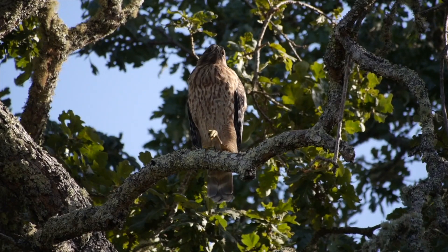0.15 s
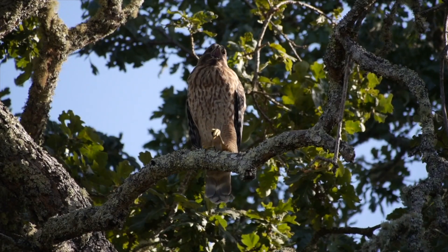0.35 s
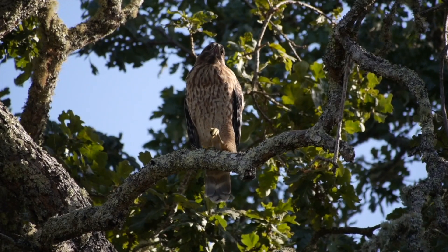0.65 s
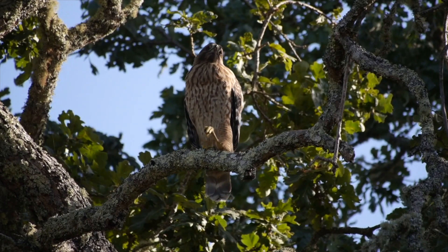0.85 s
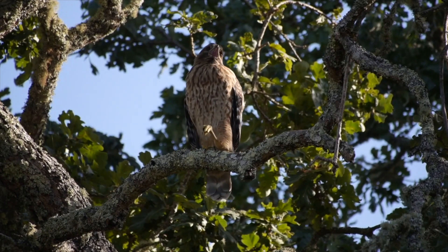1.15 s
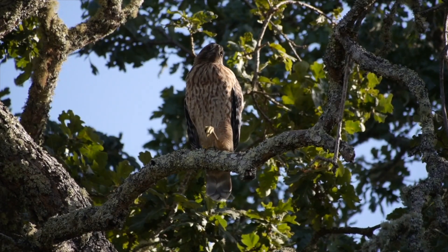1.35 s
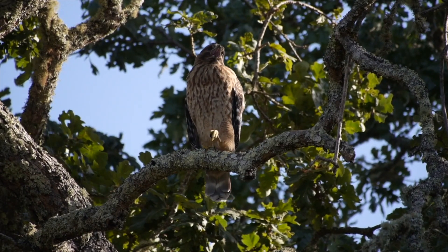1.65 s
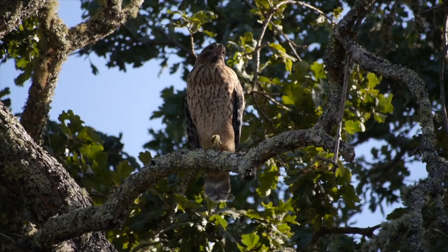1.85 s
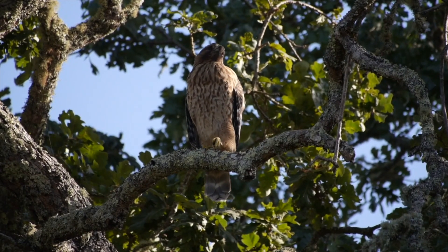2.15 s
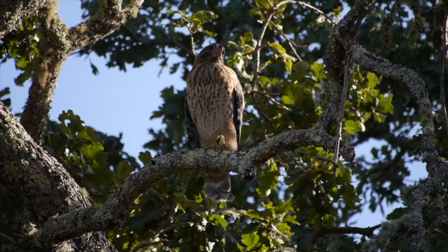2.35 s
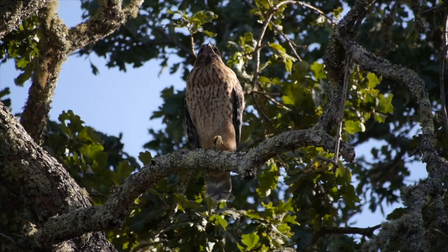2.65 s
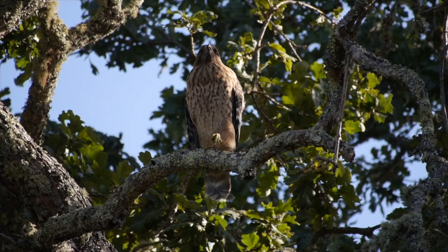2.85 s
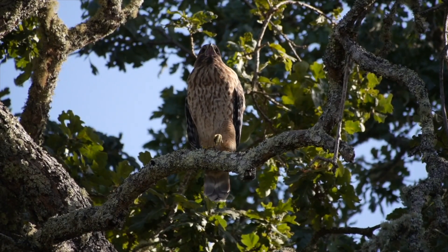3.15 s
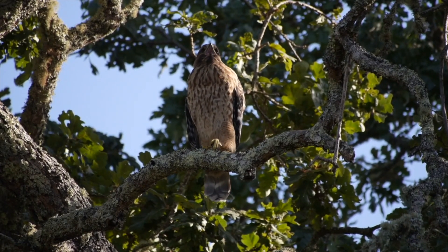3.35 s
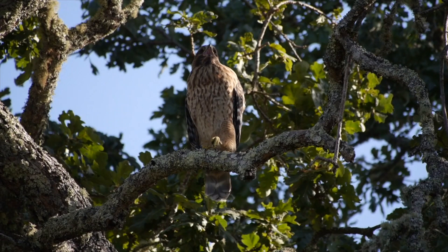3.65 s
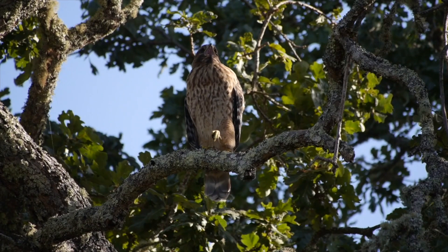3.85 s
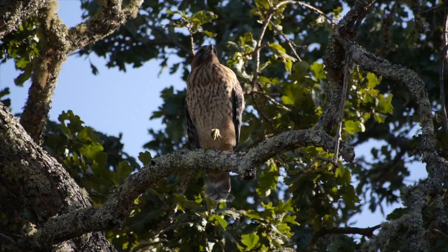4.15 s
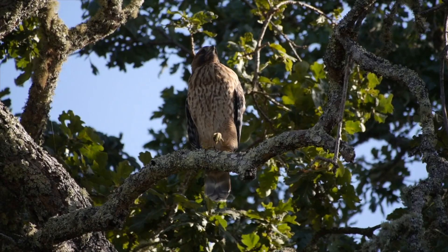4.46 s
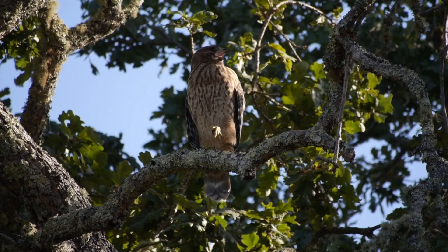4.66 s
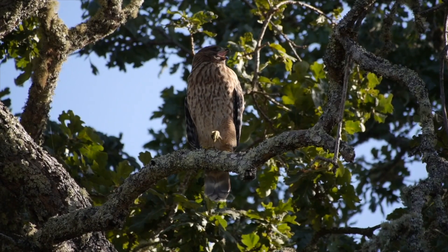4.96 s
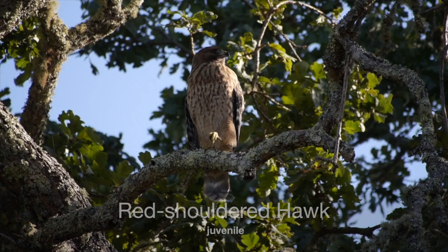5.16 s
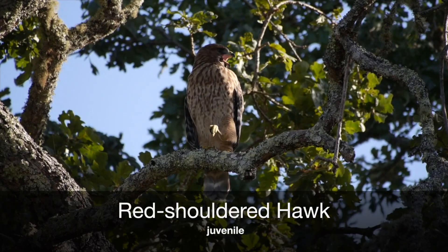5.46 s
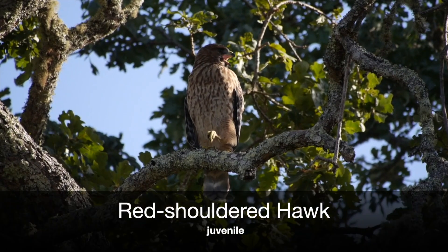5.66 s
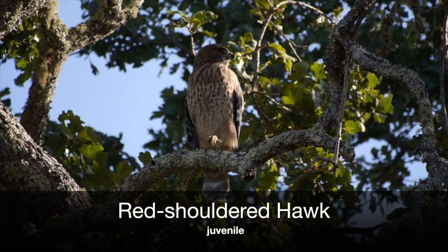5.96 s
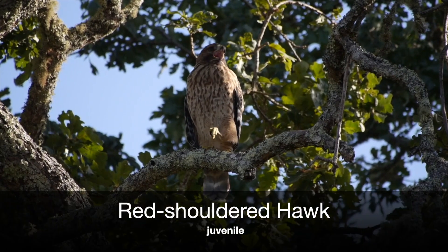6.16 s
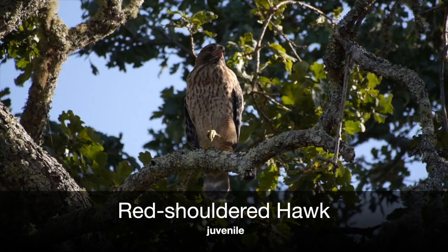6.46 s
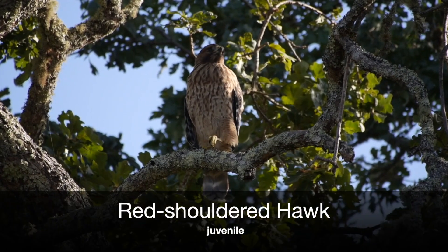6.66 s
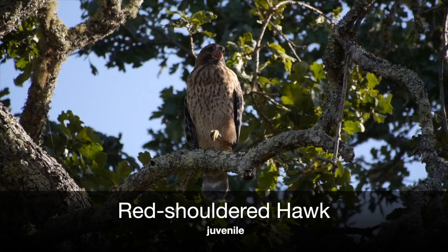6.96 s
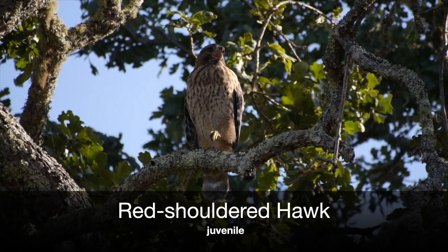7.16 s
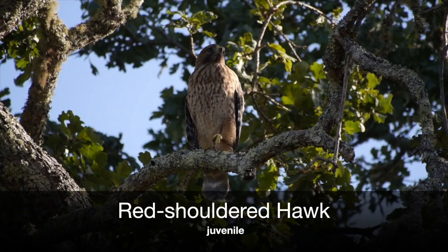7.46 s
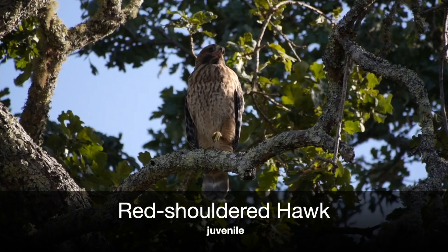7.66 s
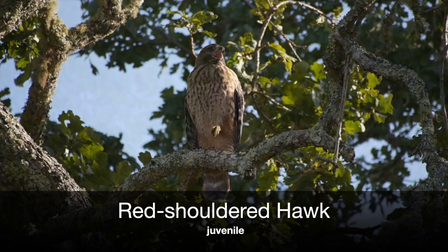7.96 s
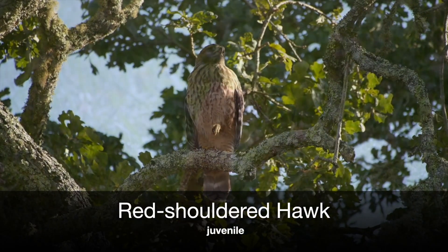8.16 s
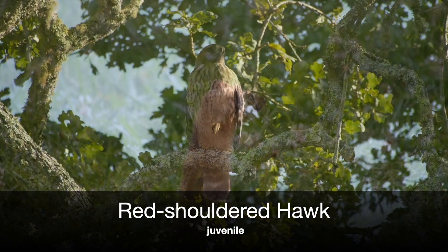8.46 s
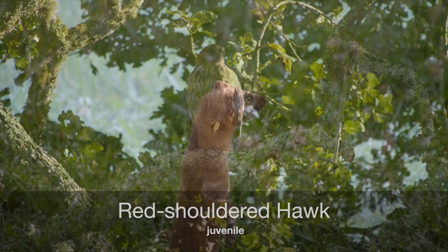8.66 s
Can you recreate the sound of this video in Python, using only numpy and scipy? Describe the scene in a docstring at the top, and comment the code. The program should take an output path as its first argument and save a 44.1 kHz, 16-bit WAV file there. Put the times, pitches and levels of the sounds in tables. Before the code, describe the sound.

A young hawk screams from a tree, twelve calls in an even series, a little more than one a second. Each cracks up to a high note, slides down and breaks off hoarsely, with a short woodland echo. The bird stands out clearly over quiet outdoor air, faint twig ticks, rustling leaves and two tiny chirps from a distant songbird. After the last call, a low, distant engine drone swells.

```python
"""A young hawk is already screaming in an oak, over quiet air and a far hum. It calls twelve times:
its voice box (the syrinx) cracks up to a high note, slides down and breaks off hoarsely. A strong
reflection beats against each gliding call, and the wood echoes it. Along the way twigs tick, leaves
rustle and a small bird chirps twice. At the end a low engine drone swells."""
import sys
import numpy as np
from scipy import signal
from scipy.fft import rfft, irfft, next_fast_len
from scipy.io import wavfile
from scipy.ndimage import uniform_filter1d

SR = 44100
rng = np.random.default_rng(int(sys.argv[2]) if len(sys.argv) > 2 else 0)


def inscribe(sig):
    """Save sig as 16-bit PCM at rate SR to the path in sys.argv[1].

    A 1-D sig is mono; a 2-D sig holds one channel per row.
    Samples are clipped to [-1, 1] before scaling.
    """
    pcm = np.round(np.clip(np.atleast_2d(sig).T, -1, 1) * 32767)
    wavfile.write(sys.argv[1], SR, pcm.astype(np.int16))


N = 388962
T = np.arange(N) / SR
TOP_HZ = 15600  # sound above this is cut

# how the throat and open beak favour some frequencies: f/Hz, level/dB
THROAT = [(750, -20), (1200, -23), (1700, -9), (2100, -4.5), (2550, -0.5), (3000, -5), (3500, -15),
          (4300, -22.5), (5100, -20), (6100, -26), (8200, -29.5), (9400, -41), (11500, -37.5), (15000, -53)]


def hawk():
    """All the screams; reflections weaken and strengthen each harmonic in turn as it slides."""
    # one call a row: start/s, time to the break/s, rise/s, peak held until/s, drop/s, collapse/s,
    # peak f/Hz, f the drop heads for/Hz, f the slide heads for/Hz, level/dB, brightness/dB
    screams = [(-0.22, 0.37, 0.027, 0.11, 0.064, 0.032, 1738, 1456, 1163, -31, -1.5),
               (0.424, 0.37, 0.019, 0.094, 0.065, 0.03, 1744, 1425, 1173, -31.5, 0.5),
               (1.066, 0.371, 0.019, 0.1, 0.031, 0.041, 1742.0, 1559, 1191, -30.5, 0.5),
               (1.71, 0.36, 0.021, 0.11, 0.036, 0.031, 1740, 1557, 1172, -30.5, 1.0),
               (2.364, 0.47, 0.028, 0.1, 0.15, 0.045, 1741.0, 874.0, 1231, -31, 0.0),
               (3.1, 0.4, 0.023, 0.11, 0.041, 0.041, 1735, 1471, 1198, -30, -0.5),
               (3.799, 0.42, 0.029, 0.1, 0.084, 0.041, 1751, 1445, 1188, -30.5, 0.5),
               (4.643, 0.48, 0.023, 0.14, 0.034, 0.052, 1690, 1527, 1182, -31, -6.5),
               (5.406, 0.406, 0.029, 0.091, 0.09, 0.07, 1673, 1304, 1282, -30.5, -11.5),
               (6.187, 0.42, 0.03, 0.11, 0.06, 0.057, 1729, 1458.0, 1216, -30.5, -3.5),
               (6.944, 0.43, 0.036, 0.093, 0.085, 0.056, 1751, 1407.0, 1233, -30.5, -3.5),
               (7.812, 0.41, 0.041, 0.1, 0.11, 0.075, 1755, 1201.0, 1313, -31, -4.0)]
    # bounces off nearby surfaces: delay/ms, gain
    reflections = [(5.79, 0.8), (5.148, -0.19), (4.571, -0.21), (3.987, -0.13)]
    voice = sum(scream(call) for call in screams)
    return voice + sum(gain * delay(voice, ms) for ms, gain in reflections)


def scream(call, hoarse_hz=1130, strain_s=.13, tremble_db=.73, rattle_db=2.3):
    """One call: air shakes the membranes of the syrinx, strained at first and slack at the end."""
    start, length, _, _, _, collapse_s, *_, call_bright_db = call
    size = int((length + collapse_s) * SR)
    t = T[:size]
    hz = pitch_glide(t, call)
    level_db, bright_db = effort(t, hz, call)
    hz = hz * (1 + .0038 * wander(size, 40))  # a slight waver
    hz = uniform_filter1d(hz, size=130, mode="nearest")  # round off the corners
    slack = 1 / (1 + np.exp(np.clip((hz - hoarse_hz) / 35, -30, 30)))  # near 1 at low pitch
    strain = np.exp(-(t / strain_s) ** 4)  # near 1 on the opening note
    # the membranes rattle when slack and shake a little under strain
    rough = slack * (.023 * (1 - strain) + .017 * strain) + .0025 * strain
    flutter = (.0015 + .003 * np.clip(bright_db / 10, 0, 1)) * wander(size, 160)
    hz = hz * (1 + rough * wander(size, 500) + flutter)
    phase = 2 * np.pi * np.cumsum(hz) / SR
    voice = syrinx(hz, phase, slack, strain, bright_db, call_bright_db)
    voice += torn_air(phase, slack, strain, bright_db)
    # the voice trembles slightly, and sputters as it collapses
    level_db += tremble_db * wander(size, 86)
    level_db += rattle_db * slack * (1 - strain) * wander(size, 280)
    fades = np.clip(t / .005, 0, 1) * np.clip((t[-1] - t) / .012, 0, 1)
    out = np.zeros(N)
    at = int(start * SR) + np.arange(size)
    heard = (at >= 0) & (at < N)
    out[at[heard]] = (voice * undb(level_db) * fades)[heard]
    return out


def pitch_glide(t, call, slack_hz=700, clear_hz=1420, break_hz=1147, crack_s=.022,
                favourite_hz=1281.4, step_hz=85.9, linger=.2):
    """Slack membranes crack up to a clear note; it rises, holds, drops, slides and collapses."""
    # the voice catches and lifts for a moment: t/s, length/s, lift/Hz
    catches = [(0.581, 0.059, 46), (2.696, 0.12, 32.1), (6.384, .06, 51)]
    start, length, rise_s, hold_s, drop_s, collapse_s, peak_hz, drop_hz, end_hz, _, _ = call

    def ease(begin_s, span_s):
        """Stay at 1 until begin_s, then sink smoothly towards 0."""
        return np.exp(-(np.maximum(t - begin_s, 0) / span_s) ** 1.3)

    hz = drop_hz + (peak_hz - drop_hz) * ease(hold_s, drop_s)  # peak and quick drop
    hz -= (peak_hz - clear_hz) * ease(crack_s, rise_s)  # rise to the peak
    hz += (end_hz - drop_hz) * np.maximum(t - hold_s, 0) / (length - hold_s)  # slow slide
    hz -= (end_hz - break_hz) * np.exp(np.minimum(t - length, 0) / (.4 * collapse_s))  # last sag
    for s, catch_s, lift_hz in catches:
        hz += lift_hz * np.sin(np.pi * np.clip((start + t - s) / catch_s, 0, 1)) ** 2
    # the slide lingers on notes step_hz apart
    hz -= linger * step_hz / (2 * np.pi) * np.sin(2 * np.pi * (hz - favourite_hz) / step_hz)
    hz = np.where(t < crack_s, slack_hz + (clear_hz - slack_hz) * (t / crack_s) ** 1.4, hz)
    collapse = np.exp(-np.maximum(t - length, 0) / (.55 * collapse_s))
    return np.where(t > length, slack_hz + (break_hz - slack_hz) * collapse, hz)


def effort(t, hz, call, attack_s=.027, push_s=.078, crack_s=.022):
    """Level and brightness in dB: both follow the pitch and are lifted by the first push of air."""
    # how loud and shrill the syrinx is at each pitch: f/Hz, level/dB, brightness/dB
    register = [(700, -12, -7.5), (900, -10.5, -2.5), (1188, -1.5, -0.5), (1233, 0.5, 0), (1293, 2, -5),
                (1390, -1.5, -2.5), (1458, -1.5, 9.5), (1525, -0.5, 13.5), (1677, 0.8, 6.5), (1730, 1, 0)]
    note_hz, note_db, note_bright_db = np.transpose(register)
    _, _, _, hold_s, *_, call_db, call_bright_db = call
    push = np.exp(-(t / push_s) ** 2)
    attack_db = -16.5 * np.maximum(1 - t / attack_s, 0)
    level_db = call_db + attack_db + 3 * push + np.interp(hz, note_hz, note_db) * (t > crack_s)
    # a weak scream gets duller still on the way down
    bright_db = call_bright_db * np.interp(t, [hold_s, 2 * hold_s], [.77, 1])
    return level_db, bright_db + 5 * push + np.interp(hz, note_hz, note_bright_db)


def syrinx(hz, phase, slack, strain, bright_db, call_bright_db):
    """Vibrating membranes make harmonics (multiples of the pitch) that ring in the throat."""
    # strength of the first harmonics, the last also for all above: level/dB
    harmonics_db = [3, 0.5, -5.5, -5.5, -6, -6.5]
    # tones between the harmonics: multiple of the pitch, level/dB
    growl = [(1.5, -29.5), (1.75, -18.5)]
    # how much of the brightness each part of the treble takes: f/Hz, share
    shrill = [(3000, 0.058), (5000, 0.47), (6300, 1), (8000, 0.66), (12000, 0.28)]
    throat_hz, throat_db = np.transpose(THROAT)
    size = len(hz)

    def tone(k, db):
        """A sine at k times the pitch, shaped by the throat and brightened by effort."""
        tone_hz = k * hz
        db = db + np.interp(np.log(tone_hz), np.log(throat_hz), throat_db)
        db += bright_db * np.interp(tone_hz, *np.transpose(shrill))
        # weak screams lose extra treble at the very top
        db += .52 * call_bright_db * np.interp(tone_hz, (9000, 12100), [0, 1])
        return np.sqrt(2) * undb(db) * np.sin(k * phase) * (tone_hz < TOP_HZ)

    # the lowest tone takes a moment to build, and fades when the membranes go slack
    build_db = -8 * np.exp(-(T[:size] / .027) ** 2)
    voice = tone(1, harmonics_db[0] + build_db - 4 * slack * (1 - strain))
    for k in range(2, 15):
        base_db = harmonics_db[min(k, len(harmonics_db)) - 1]
        flicker_db = min(2.3 * max(k - 2, .3), 2.6) * wander(size, 30)  # upper ones flicker most
        slack_db = 3 * slack * (k == 3)  # slack membranes favour the third harmonic
        voice += tone(k, base_db + flicker_db + slack_db)
    # unequal cycles growl between the harmonics, under strain and where the voice breaks
    for k, growl_db in growl:
        voice += strain * tone(k, growl_db + 4 * wander(size, 60))
    return voice + slack * tone(2.5, -8 + 4 * wander(size, 200))


def torn_air(phase, slack, strain, bright_db):
    """Air torn once a cycle: a rasp that grows with effort, and a dull croak when slack."""
    # the rasp as it leaves the beak: f/Hz, level/dB
    rasp_colour = [(700, -19), (1500, -17), (2200, -4.5), (2900, 2), (3500, -18.5), (4200, -25.5),
                   (5200, -13), (6200, -10.5), (8200, -13.5), (9500, -20.5), (12000, -22), (15000, -41.5)]
    torn = rng.standard_normal(len(phase)) * (1 + np.cos(phase))
    rasp_db = -37 + .46 * bright_db + 6 * strain + 2 * wander(len(phase), 40)
    rasp = unit(colour(torn, rasp_colour)) * undb(rasp_db)
    croak = unit(colour(torn, THROAT)) * undb(-15) * slack
    return rasp + croak


def oak_wood(voice):
    """The direct sound, quick echoes in the oak's crown, and the long answer of the trees around."""
    # where the hawk sits: f/Hz, left minus right level/dB
    hawk_pan = [(700, 2.5), (1290, -1), (2380, -1.94), (4400, -2), (8120, 2.5), (15000, 1)]
    # tone of the wood's long echo: f/Hz, level/dB
    wood = [(700, -1.5), (1500, 2), (2500, -0.5), (3100, 2), (3800, 5.5), (5000, 9.5), (6000, 8.5),
            (10000, -15), (15000, -25)]
    direct = np.array([colour(voice, [(hz, side * db / 2) for hz, db in hawk_pan]) for side in (1, -1)])
    off_leaves = colour(voice, [(1500, -3), (2700, -1), (4000, 2), (5500, 7), (10000, 8)])
    crown = scatter(off_leaves, decay_s=.19, db=-14.5, onset_s=.002)
    trees = scatter(colour(voice, wood), decay_s=.68, db=-20, onset_s=.0069)
    return direct + crown + trees


def scatter(x, decay_s, db, onset_s):
    """Echoes from countless leaves and limbs, dying away by 60 dB in decay_s."""
    t = T[:2 * SR]
    tail = diffuse()[:, :len(t)] * np.exp(-np.log(1000) * t / decay_s) * (1 - np.exp(-t / onset_s))
    tail *= undb(db) / np.sqrt(np.sum(tail ** 2) / 2)
    return signal.fftconvolve(x[None], tail, axes=1)[:, :N]


def foliage(ring_s=.017, ring_width_hz=2200):
    """Twigs snap and ring briefly; leaves rustle."""
    # twigs: t/s, level/dB, centre f/Hz
    ticks = [(.92, -58, 4000), (1.667, -57, 5000), (2.146, -53, 5500), (3.076, -58, 5000),
             (8.052, -42.5, 5000), (8.556, -43.5, 2850), (8.659, -48.5, 2810), (8.741, -56, 4800)]
    # leaves: t/s, length/s, centre f/Hz, width/Hz, level/dB
    rustles = [(0.853, 0.56, 835, 900, -57.5), (1.526, 0.24, 1100, 900, -62),
               (7.368, 0.38, 5730, 1500, -71), (8.509, 0.04, 3680, 2480, -59.5)]
    noise, out = diffuse(), np.zeros((2, N))
    snap = unit(colour(noise, [(1000, -20), (3500, -3), (8000, -11), (15000, -28)])) * undb(-20)
    for s, db, hz in ticks:
        fade = np.exp(-np.log(1000) * np.abs(T - s) / ring_s) * (T >= s)
        ring = unit(resonate(resonate(noise, hz, ring_width_hz), hz, 2 * hz))
        out += (ring * fade + snap * fade ** 2) * undb(db - 3)
    for s, length, hz, width_hz, db in rustles:
        rustle = unit(resonate(resonate(noise, hz, width_hz), hz, width_hz))
        out += rustle * swell(s, length) * undb(db)
    return out


def songbird():
    """A small far bird gives thin, gliding whistles."""
    # whistles: t/s, length/s, start f/Hz, end f/Hz, level/dB
    chirps = [(1.622, 0.053, 3880, 4250, -63), (6.01, 0.087, 6750, 5950, -70)]
    out = np.zeros(N)
    for s, length, start_hz, end_hz, db in chirps:
        hz = np.interp(T, [s, s + length], [start_hz, end_hz]) * (1 + .008 * wander(N, 200))
        out += undb(db) * swell(s, length) * np.sin(2 * np.pi * np.cumsum(hz) / SR)
    return out


def engine(waver=.0033):
    """A distant motor: tones that follow one slightly unsteady shaft, over a rumble."""
    # the shaft's tones, before the swell: f/Hz, level/dB
    tones = [(80.7, -67), (161.4, -60.5), (242.1, -69.5), (322.8, -71), (403.6, -64), (942, -74),
             (1120, -83.5)]
    # shape of the rumble: f/Hz, level/dB
    rumble = [(25, -37), (50, -18.5), (85, -3.5), (170, -2), (260, -9.5), (550, -27), (1000, -14.5),
              (2100, -19.5), (4000, -29.5), (8000, -50), (15000, -62)]
    # how the whole drone swells: t/s, level/dB
    growth = [(7.9, -46), (8.15, -13.5), (8.4, -7), (8.65, -0.5), (8.82, 3)]
    drone = unit(colour(diffuse(), rumble)) * undb(-59)
    shaft_time = np.cumsum(1 + waver * wander(N, 8.2)) / SR
    for hz, db in tones:
        drone += np.sqrt(2) * undb(db + 1.5 * wander(N, 10)) * np.cos(2 * np.pi * hz * shaft_time)
    return pan(drone * undb(np.interp(T, *np.transpose(growth))), .5)


def air(hum_hz=780, hum_width_hz=7):
    """Quiet outdoor air with a thin, wavering hum far away."""
    # shape of the still air's hush: f/Hz, level/dB
    air_colour = [(25, -20), (45, -13.5), (100, -1.5), (160, -5), (280, -6.5), (500, -11.5), (800, -11),
                  (1300, -13), (2050, -21.5), (2500, -13.5), (3200, -25), (5000, -31), (9000, -40.5),
                  (15000, -49)]
    hush = unit(colour(diffuse(), air_colour)) * undb(-60.5 + .53 * wander(N, 1.5))
    hum = unit(resonate(resonate(diffuse(), hum_hz, hum_width_hz), hum_hz, 60)) * undb(-70)
    return pan(hush + hum, 1.5)


def diffuse():
    """Noise from all round: left and right share the bass and less of the treble."""
    mid, side = rng.standard_normal((2, N))
    side = colour(side, [(50, -29.5), (125, -27.5), (250, -12), (600, -6.0), (4000, -6.5)])
    return mid + np.array([side, -side])


def undb(db):
    """Turn decibels into a gain."""
    return np.exp(np.asarray(db) * np.log(10) / 20)


def unit(x):
    """Scale to an average size (rms) of 1."""
    return x / np.sqrt(np.mean(x ** 2))


def colour(x, points):
    """Turn frequencies up or down along a curve of (f/Hz, level/dB) points."""
    hz, db = np.transpose(points)
    size = next_fast_len(x.shape[-1], real=True)
    bins = np.maximum(np.fft.rfftfreq(size, 1 / SR), 1)
    gain = undb(np.interp(np.log(bins), np.log(hz), db))
    return irfft(rfft(x, size) * gain, size)[..., :x.shape[-1]]


def resonate(x, hz, width_hz):
    """Let through a band around hz, with gain 1 at its centre."""
    hz = min(hz, .45 * SR)
    return signal.lfilter(*signal.iirpeak(hz, hz / width_hz, fs=SR), x)


def wander(size, rate):
    """A smooth random curve of rms 1 that changes about rate times a second."""
    coarse = max(size // 8, 2)
    padded = next_fast_len(coarse)
    bins = np.fft.rfftfreq(padded, size / coarse / SR)
    slow = irfft(rfft(rng.standard_normal(padded)) / (1 + (bins / rate) ** 2), padded)[:coarse]
    return np.interp(np.linspace(0, coarse - 1, size), np.arange(coarse), unit(slow))


def delay(x, ms):
    """Delay by ms milliseconds, even between samples."""
    size = next_fast_len(len(x) + SR)
    turns = np.fft.rfftfreq(size, 1 / SR) * ms / 1000
    return irfft(rfft(x, size) * np.exp(-2j * np.pi * turns), size)[:len(x)]


def swell(start, length):
    """A smooth rise and fall."""
    return np.sin(np.pi * np.clip((T - start) / length, 0, 1))


def pan(x, db):
    """Make the left channel db louder than the right."""
    return x * undb(np.array([[db], [-db]]) / 2)


def scene():
    """The hawk in its wood, over the background."""
    return oak_wood(hawk()) + air() + engine() + foliage() + songbird()


def record(dry, ceiling_db=-21.8, react_s=.003):
    """A limiter holds the loudest swells down, and a filter cuts the highest treble."""
    keep = np.exp(-1 / (react_s * SR))
    power = signal.lfilter([1 - keep], [1, -keep], np.mean(dry ** 2, axis=0))
    gain = (1 + (power / undb(ceiling_db) ** 2) ** 4) ** (-1 / 8)
    return signal.sosfilt(signal.ellip(8, .2, 70, TOP_HZ, fs=SR, output="sos"), dry * gain)


dry = scene()
out = record(dry)
inscribe(out)
```